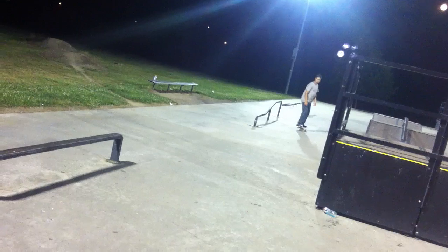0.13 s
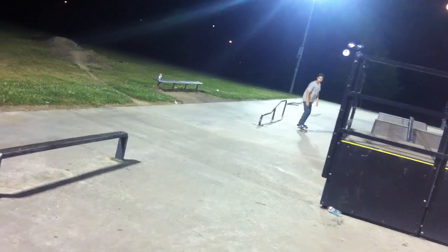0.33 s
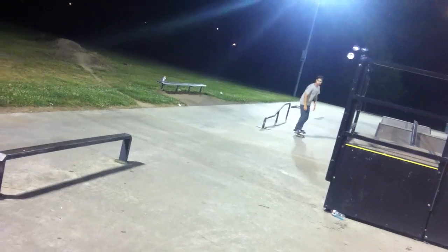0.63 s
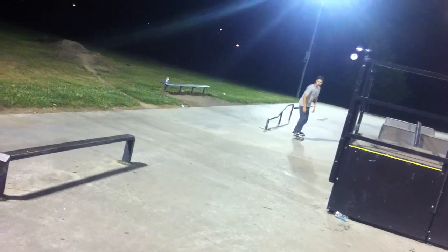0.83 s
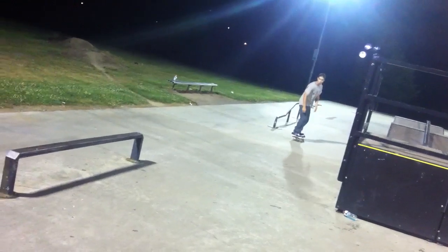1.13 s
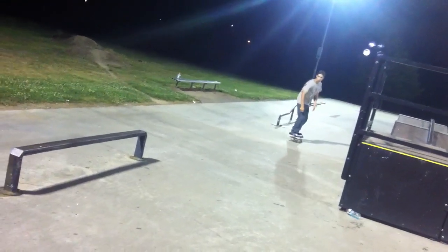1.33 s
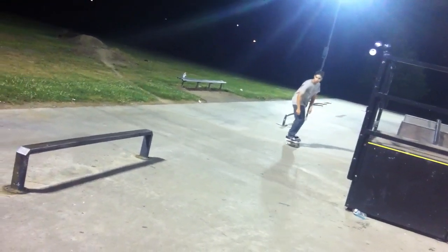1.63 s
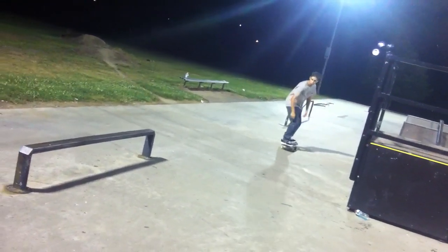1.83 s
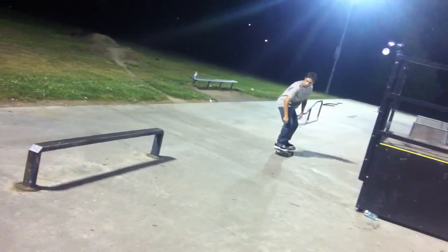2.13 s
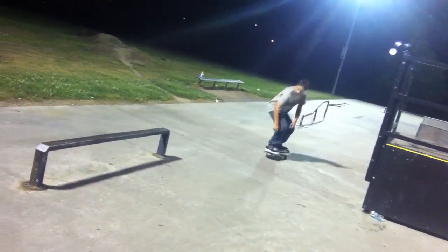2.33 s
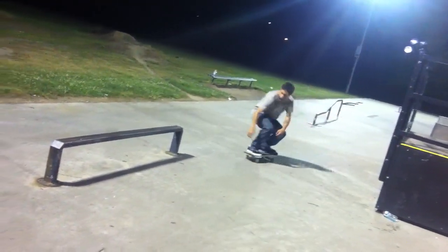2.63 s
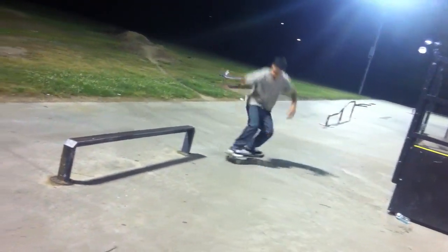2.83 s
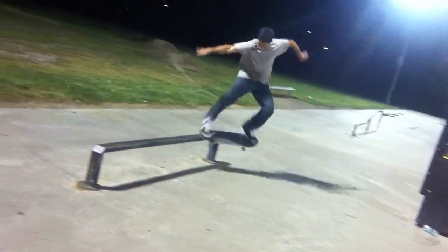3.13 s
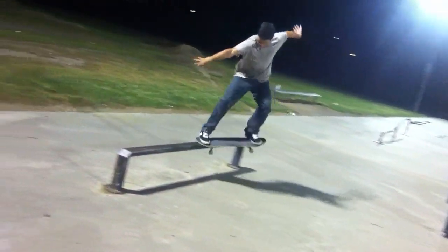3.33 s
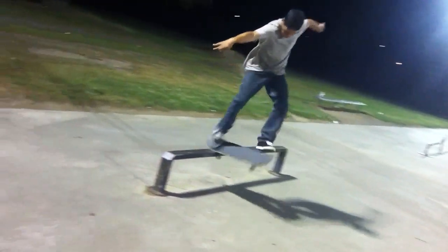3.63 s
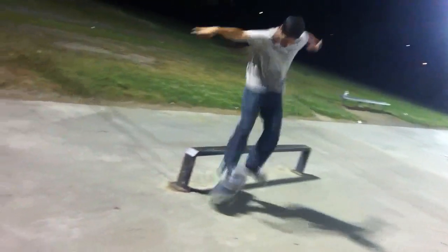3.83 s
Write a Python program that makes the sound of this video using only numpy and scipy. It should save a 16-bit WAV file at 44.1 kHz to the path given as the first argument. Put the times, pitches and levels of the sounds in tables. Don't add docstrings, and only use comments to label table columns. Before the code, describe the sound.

A skateboard rolls closer over concrete, pops, slams and scrapes a steel rail, then lands hard.

```python
import sys
import numpy as np
from scipy import signal
from scipy.fft import rfft, irfft
from scipy.io import wavfile
from scipy.ndimage import uniform_filter1d

SR = 44100
rng = np.random.default_rng(int(sys.argv[2]) if len(sys.argv) > 2 else 0)


def waveform_to_disk(signal):
    frames = np.transpose(np.atleast_2d(signal))
    scaled = np.clip(frames, -1, 1) * 32767
    samples = np.round(scaled).astype(np.int16)
    wavfile.write(sys.argv[1], SR, samples)


def volts_from_decibels(level):
    exponent = np.asarray(level, float) / 20
    return 10 ** exponent


N = 176400


def unit(x):
    return x / np.sqrt(np.mean(x ** 2))


def colour(x, points):
    p = np.array(points, float)
    hz = np.maximum(np.fft.rfftfreq(4096, 1 / SR), 1)
    log_gain = np.log(volts_from_decibels(np.interp(np.log(hz), np.log(p[:, 0]), p[:, 1])))
    cepstrum = irfft(log_gain)
    cepstrum[1:2048] *= 2
    cepstrum[2049:] = 0
    impulse = irfft(np.exp(rfft(cepstrum)))[:2048]
    return signal.fftconvolve(x, impulse)[:len(x)]


def ring(x, hz, t60):
    r = np.exp(-np.log(1000) / (t60 * SR))
    w = 2 * np.pi * hz / SR
    return signal.lfilter([0, r * np.sin(w)], [1, -2 * r * np.cos(w), r * r], x)


def body(x, peaks):
    out = 0
    for k, (hz, width, db) in enumerate(peaks):
        b, a = signal.iirpeak(hz, hz / width, fs=SR)
        out = out + (-1) ** k * volts_from_decibels(db) * signal.lfilter(b, a, x)
    return out


def walk(rate):
    k = int(SR / rate)
    held = rng.standard_normal(N)[np.arange(N) // k]
    return 1.6 * uniform_filter1d(uniform_filter1d(held, k), k)


def curve(rows):
    r = np.array(rows)
    return np.interp(np.arange(N) / SR, r[:, 0], r[:, 1])


def grit(per_s, spread_db):
    hit = rng.random(N) < per_s / SR
    size = volts_from_decibels(spread_db * np.minimum(rng.exponential(size=N), 3))
    return unit(hit * rng.standard_normal(N) * size)


def decay(t60, count):
    tail = rng.standard_normal(count) * np.exp(-np.log(1000) * np.arange(count) / SR / t60)
    return tail / np.sqrt(np.sum(tail ** 2))


def contacts(rows, rise):
    noise = np.sign(rng.standard_normal(N))
    sharp, deep = np.zeros(N), np.zeros(N)
    for s, db, share_db, length in rows:
        i = int(s * SR)
        u = np.arange(min(int(8 * length * SR), N - i)) / SR
        envelope = np.minimum(u / (rise * length), 1) * np.exp(-u / length)
        force = volts_from_decibels(db) * envelope * noise[i:i + len(u)]
        sharp[i:i + len(u)] += force
        deep[i:i + len(u)] += force * volts_from_decibels(share_db)
    return sharp, deep


def knock(rows, crack_db, body_db, peaks, rise, ping_db):
    sharp, deep = contacts(rows, rise)
    crack = signal.lfilter(*signal.butter(2, [300, 8550], "band", fs=SR), sharp)
    truck_ping = body(sharp, [(5390, 510, ping_db)])
    return volts_from_decibels(crack_db) * (crack + truck_ping) + volts_from_decibels(body_db) * body(deep, peaks), sharp


# f/Hz, level/dB
AIR_TONE = [(40, -0.5), (150, 8), (400, 6), (1500, 3.5), (3000, -4.5), (6000, -15.5), (9000, -12),
            (16000, -8)]


def night_air():
    level_db = -52.5 + 0.44 * walk(6.6)
    return unit(colour(rng.standard_normal(N), AIR_TONE)) * volts_from_decibels(level_db)


# t/s, level/dB
ROLL_LEVEL = [
    (.09, -54),
    (.35, -53),
    (.45, -49),
    (1.3, -48.5),
    (1.9, -44),
    (2.3, -44),
    (2.5, -41),
    (2.85, -41),
    (3.08, -38.5),
]
# f/Hz, width/Hz, level/dB
BOARD = [(194, 70, 2), (598, 174, 6.5), (788, 215, 9.5), (1526, 98, 3.5), (1747, 160, 7), (2500, 1500, -19),
         (5780, 400, -3.5)]
LIFT_S, LIFT_FADE_S = 3.114, 0.0071
SPIN_DB = -12
CROUCH_S, CROUCH_DB = 2.3, 7


def rolling():
    t = np.arange(N) / SR
    g = grit(per_s=10000, spread_db=1.45)
    parts = 0
    for k, peak in enumerate(BOARD):
        parts = parts + (-1) ** k * volts_from_decibels(walk(25.5)) * body(g, [peak])
    crouch = np.clip((t - CROUCH_S) / (LIFT_S - CROUCH_S), 0, 1)
    load = volts_from_decibels(CROUCH_DB * crouch) - 1
    parts = parts + load * (body(g, [(302, 150, 1)]) + body(g, [(2370, 140, 2.5)]))
    hiss = volts_from_decibels(-12.5) * (0.87 * g + 0.75 * rng.standard_normal(N))
    level = volts_from_decibels(curve(ROLL_LEVEL) - 1.0 + 0.99 * walk(40.88))
    ground = np.exp(-np.maximum(t - LIFT_S, 0) / LIFT_FADE_S) + (t > LIFT_S) * volts_from_decibels(SPIN_DB)
    return unit(parts + hiss) * level * ground


# t/s, level/dB, body share/dB, length/s
KNOCKS = [(0.098, -37, 0.5, 0.0035), (.385, -35, -4, 0.0034), (0.506, -37, 3.5, 0.0027),
          (1.783, -33, 1, .004), (1.799, -29, -1.5, 0.0031), (1.9115, -24.5, 0.5, 0.0028),
          (1.9175, -21.5, -1, 0.0023), (2.366, -35.5, 0, 0.0049), (2.915, -28.5, 0, 0.0081),
          (3.06, -40.5, -1, 0.0071), (3.085, -24.5, -23, 0.0054), (3.094, -29, -16, 0.0053),
          (3.872, -40, 12, 0.0035), (3.916, -40, -6, 0.0041)]
# f/Hz, width/Hz, level/dB
HIT_BODY = [(203, 79, -10.5), (766, 225, 5.5), (1020, 37, -8.5), (1250, 270, 3), (1950, 850, 2.5),
            (2426, 110, 2)]


def joint_knocks():
    return knock(KNOCKS, -8.0, 4.6, HIT_BODY, rise=0.14, ping_db=5.2)[0]


# t/s, level/dB, body share/dB
TICKS = [(0.1423, -28, -12.5), (0.191, -44, -5), (0.23, -40, -5), (0.272, -30, -16), (0.326, -36, -6),
         (0.374, -30.5, -10.5), (0.421, -35.5, -5), (0.462, -30, -16), (0.547, -26.5, -12),
         (0.588, -29, -16), (0.6327, -34.5, -5), (0.6679, -21.5, -19), (0.7282, -32, 0),
         (0.7972, -21.5, -13.5), (.842, -41, -10), (0.875, -32.5, -11), (0.917, -35.5, -6),
         (0.966, -37.5, -2), (1.0124, -39, 7.5), (1.057, -34, 1), (1.1054, -39, 5), (1.1487, -41, 7),
         (1.197, -38.5, 2), (1.2434, -31, -8), (1.291, -35, -4), (1.3363, -41.5, 5), (1.381, -42, -1),
         (1.4299, -37.5, 4), (1.476, -33.5, 1), (1.5237, -28, -11),
         (1.5677, -38.5, 0), (1.613, -44, 0), (1.658, -26, -11), (1.706, -37.5, 3), (1.752, -40, 3.5),
              (1.787, -15, -17), (1.816, -32, -6), (1.844, -36, -3), (1.889, -38.5, 5.5),
              (1.9846, -32.5, -1.5), (2.0352, -28, -11.5), (2.08, -27.5, -6), (2.1266, -30.5, -5),
              (2.178, -41, -7), (2.2243, -23, -12), (2.271, -29, -9), (2.318, -32, 1), (2.348, -25, -12),
              (2.408, -40, -8), (2.4524, -32, -1.5), (2.497, -32, -3), (2.5414, -28, -9),
              (2.582, -20.5, -14), (2.6207, -29, -11), (2.662, -31, -6), (2.7025, -25, -26),
              (2.745, -42, -10), (2.81, -28, -11), (2.8377, -24.5, -5), (2.871, -29, -21),
              (2.896, -21, -33), (2.995, -25, -26)]
# f/Hz, width/Hz, level/dB
TICK_BODY = [(700, 270, -2.5), (1405, 83, 2.5), (1742, 123, 3.5)]
TICK_S = 0.0041


def wheel_ticks():
    rows = [(*row, TICK_S) for row in TICKS]
    return knock(rows, -11, 13.7, TICK_BODY, rise=0.37, ping_db=0.55)[0]


# t/s, level/dB, f/Hz
THUMPS = [
    (0.67, -39.5, 217),
    (1.785, -30, 156),
    (3.09, -44, 230),
    (3.115, -35, 302),
    (3.265, -20, 224),
    (3.975, -24, 265),
]
THUMP_T60_S, JOLT_HZ, JOLT_DB = 0.052, 35, 11


def thumps():
    out = np.zeros(N)
    for s, db, hz in THUMPS:
        push = np.zeros(N)
        push[int(s * SR):int(s * SR) + 60] = volts_from_decibels(db) / 60
        out += ring(push, hz, THUMP_T60_S)
        for m in (1.6, 2.3, 3.4):
            out += .5 * ring(push, m * hz, THUMP_T60_S / m)
        out += volts_from_decibels(JOLT_DB) * ring(push, JOLT_HZ, THUMP_T60_S)
    return signal.lfilter(*signal.butter(2, 110, "high", fs=SR), out)


# t/s, level/dB, body share (unheard)/dB, length/s
SPITS = [
    (.9638, -30, 0, 0.0024),
    (2.0354, -28, 0, .002),
    (2.7508, -24, 0, .002),
    (3.72, -35, 0, 0.0088),
    (3.745, -35, 0, .004),
    (3.917, -36, 0, .002),
    (3.9688, -14, 2.5, 0.005),
    (3.976, -11, 2, 0.0067),
]


def spits():
    sharp = contacts(SPITS, rise=0.45)[0]
    return signal.lfilter(*signal.butter(5, 10600, "high", fs=SR), sharp)


# t/s, level/dB, body share/dB, length/s
POP = [
    (3.1154, -2, -10.5, 0.0004),
    (3.1161, 16, -13, 0.000042),
    (3.1172, -8.5, -4.5, 0.0024),
    (3.1288, -19, -12, 0.00063),
    (3.131, -31.5, 1, 0.0029),
]
# f/Hz, width/Hz, level/dB
POP_BODY = [(250, 80, -1.5), (710, 100, 6.5), (1350, 80, 13), (1870, 220, 6), (2240, 160, -1),
            (2560, 150, 7)]


def tail_pop():
    return knock(POP, -6.5, 4.7, POP_BODY, rise=0.23, ping_db=3.6)[0]


# t/s, level/dB
SCRAPE = [
    (3.27, -31.5),
    (3.35, -38),
    (3.4, -43),
    (3.44, -40.5),
    (3.52, -42),
    (3.61, -50.5),
    (3.68, -45),
    (3.735, -48),
    (3.76, -57.5),
]


def scrape_force():
    t = np.arange(N) / SR
    rub = grit(per_s=6000, spread_db=1.0) * volts_from_decibels(curve(SCRAPE) + 2.13 * walk(60))
    rub = rub * (t > SCRAPE[0][0])
    return rub * np.exp(-np.maximum(t - SCRAPE[-1][0], 0) / 0.026)


# f/Hz, level/dB, t60/s
RAIL = [(2466, 3, 0.36), (3365, 4.5, 0.23), (4129, -24, 0.33), (4460, -29, 0.26), (4590, -28, 0.24),
        (4730, -26, 0.17), (4820, -9, 0.32), (4730, -22, 0.44), (4970, -12, 0.27), (5213, 3, 0.4),
        (5441, 2, 0.32), (6040, 6, 0.35), (5900, -16, 0.28), (6110, -18, 0.27)]
# f/Hz, level/dB, t60/s
RAIL_LOW = [(287, -8.5, 0.072), (829, -5, 0.16), (855, -6.5, 0.23), (1212, -13, 0.72), (1240, -27, 0.29),
            (1250, -4.5, 0.48), (1291, -14, 0.71), (1470, -35, .2), (1893, -15, 0.25)]
RAIL_DAMP = .35
SHELL_T60_S, SHELL_DB = .07, -2
STRIKE_DB, SING_DB = -9, -3
SHIFT_S, SHIFT_DB = 3.52, 10


def tube_ring(force, rub):
    t = np.arange(N) / SR
    drive = volts_from_decibels(STRIKE_DB) * force + volts_from_decibels(SING_DB) * rub
    tube = sum(volts_from_decibels(db + 2 * walk(22)) * ring(drive, hz, t60 * RAIL_DAMP) for hz, db, t60 in RAIL)
    stir = drive + volts_from_decibels(SHIFT_DB) * rub * np.exp(-(100 * (t - SHIFT_S)) ** 2)
    low = sum(volts_from_decibels(db + 2.5 * walk(25)) * ring(stir, hz, t60) for hz, db, t60 in RAIL_LOW)
    shell = np.zeros(N)
    for k, (a, b) in enumerate(rng.random((70, 2))):
        shell += ring(drive, 700 + 85 * (k + a), SHELL_T60_S * (.6 + .8 * b))
    modes = tube + volts_from_decibels(10.5) * low + volts_from_decibels(SHELL_DB) * shell
    return signal.lfilter(*signal.butter(2, 200, "high", fs=SR), modes)


# t/s, level/dB, body share/dB, length/s
BLOWS = [(3.2585, -20, -13, 0.0014), (3.262, -9, -13, 0.0013), (3.2642, -4, -3, 0.00063),
         (3.2663, -6, 1.5, 0.00053), (3.2678, -3, 0, 0.0013), (3.2725, -5.5, 8, 0.00083),
         (3.274, -8.5, -9, 0.00037), (3.2792, -2.5, -7, 0.00071), (3.2835, -22, -8, 0.0024),
         (3.2872, -20, 0, 0.00094), (3.293, -23, 11, 0.0023)]
# f/Hz, level/dB
SCRAPE_TONE = [(100, -38), (300, -7), (900, 14.5), (1500, 18.5), (2800, -2), (5000, 7.5), (9000, 3),
               (16000, -7)]


def rail():
    thud, force = knock(BLOWS, -10.0, 3.2, HIT_BODY, rise=0.25, ping_db=13)
    rub = scrape_force()
    wash = signal.fftconvolve(force, decay(t60=0.2, count=20000))[:N]
    crash = body(wash, [(5070, 1570, 5)])
    scrape = volts_from_decibels(-1.5) * colour(rub, SCRAPE_TONE)
    return thud + crash + volts_from_decibels(-38.5) * tube_ring(force, rub) + scrape


# t/s, level/dB, body share/dB, length/s
RELEASE = [
    (3.72, -24, -9, 0.0029),
    (3.729, -25.5, -38, 0.0043),
    (3.731, -24, -28, 0.0022),
]


def rail_release():
    return knock(RELEASE, -8.0, 4.6, HIT_BODY, rise=0.14, ping_db=5.2)[0]


# t/s, level/dB, body share/dB, length/s
SLAPS = [
    (3.9688, -8, -3, 0.0024),
    (3.972, -15.5, -2, 0.0061),
    (3.9775, -5, -7.5, 0.0024),
    (3.98, -7, 3, 0.0021),
    (3.984, -6, 4, 0.00063),
    (3.9862, -18.5, 4, 0.00086),
    (3.989, -28, 8, 0.0077),
]
# f/Hz, width/Hz, level/dB
SLAP_BODY = [(310, 94, -4.5), (640, 97, -0.5), (953, 92, 4.5), (1620, 340, 5), (2110, 310, 2.5),
             (2755, 190, 0)]


def landing():
    return knock(SLAPS, -2, 8.9, SLAP_BODY, rise=0.71, ping_db=7.8)[0]


def echo(near):
    u = np.arange(SR // 2) / SR
    tail = rng.standard_normal(len(u)) * np.exp(-np.log(1000) * u / 0.21)
    tail = tail * (u > .006)
    tail = signal.lfilter(*signal.butter(1, 6000, fs=SR), tail)
    return volts_from_decibels(-20) * signal.fftconvolve(near, tail / np.sqrt(np.sum(tail ** 2)))[:N]


START_S = 0.0835


def scene():
    t = np.arange(N) / SR
    near = rolling() + joint_knocks() + wheel_ticks() + thumps() + spits()
    near = near + tail_pop() + rail() + rail_release() + landing()
    return ((near + echo(near) + night_air()) * (t > START_S))[None]


def roll_off(x):
    return signal.sosfilt(signal.butter(12, 16080, fs=SR, output="sos"), x)


# f/Hz, level/dB
MIC = [(30, -37), (130, -4.5), (3300, -2.5), (4500, 6.5), (6300, 5), (7200, -7), (9700, -5), (10500, -18.5),
       (11900, -9.5), (15700, -9), (16400, -57)]
# from t/s, to t/s
DULLED = [
    (3.253, 3.2575),
    (3.951, 3.9655),
]
DULLED_HZ, CEILING, TOP_HZ = 2200, 1.1, 15800


def record(dry):
    x = colour(dry[0], MIC)
    t = np.arange(N) / SR
    dull = uniform_filter1d(sum((t > a) & (t < b) for a, b in DULLED) * 1., size=60)
    low = signal.sosfiltfilt(signal.butter(6, DULLED_HZ, fs=SR, output="sos"), x)
    x = x - dull * (x - low)
    x = CEILING * np.tanh(x / CEILING)
    mix = signal.sosfilt(signal.ellip(8, .2, 60, TOP_HZ, fs=SR, output="sos"), x)
    return roll_off(mix)


dry = scene()
out = record(dry)
waveform_to_disk(out)
```